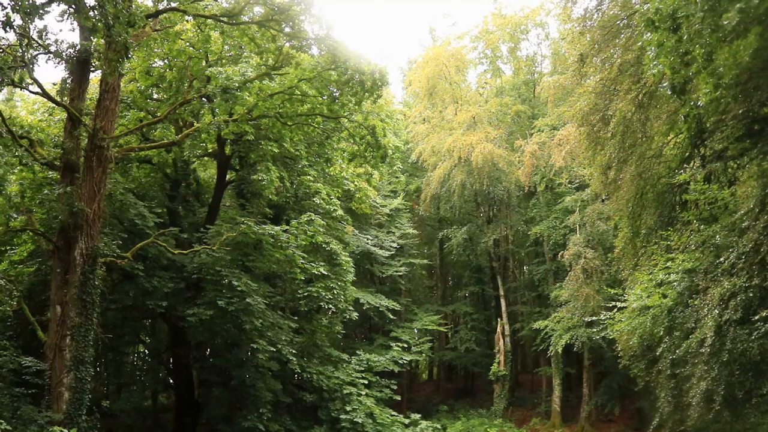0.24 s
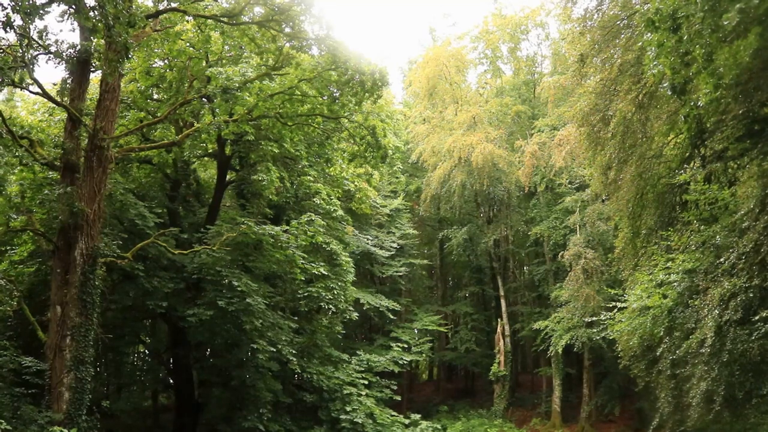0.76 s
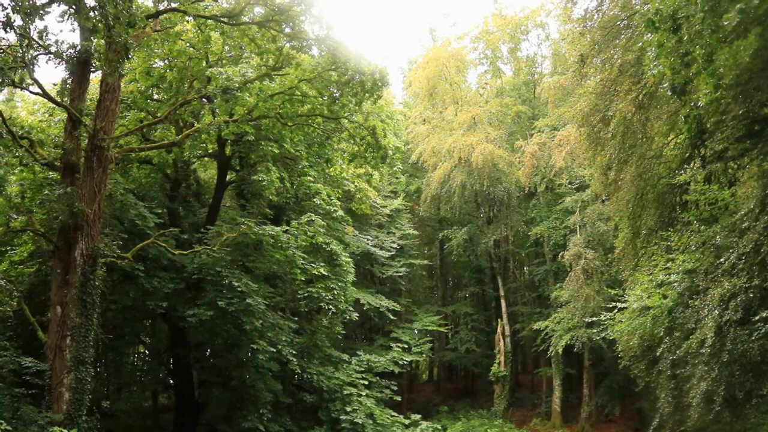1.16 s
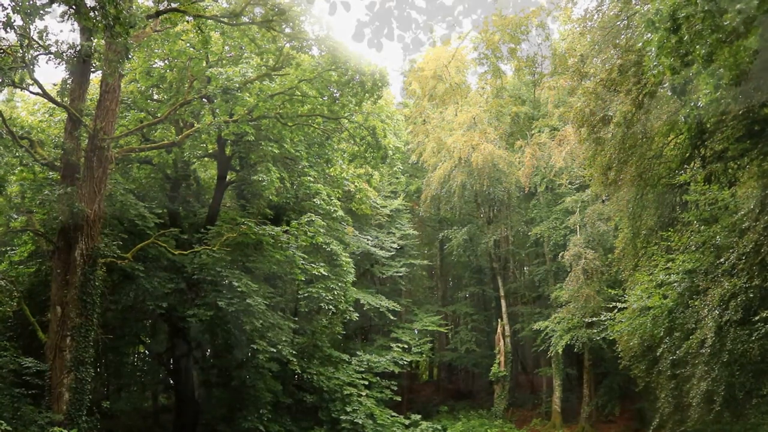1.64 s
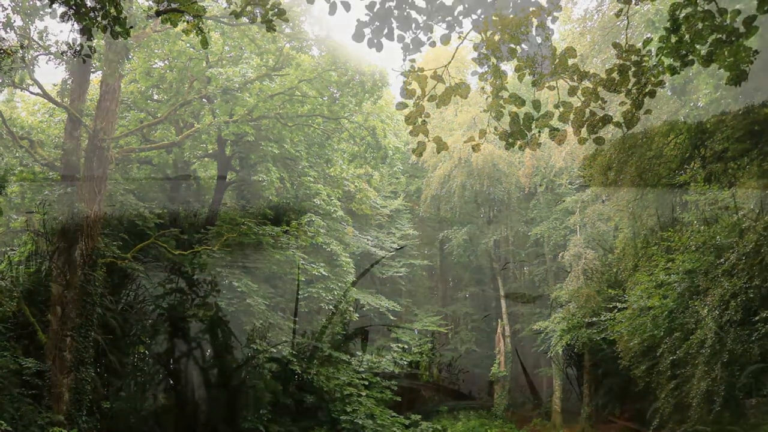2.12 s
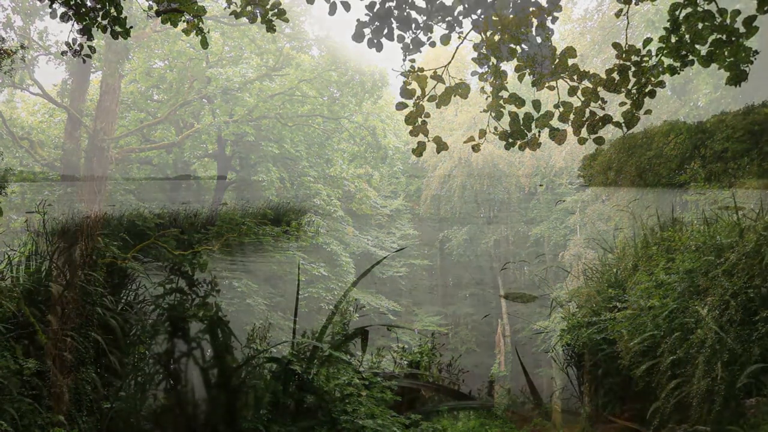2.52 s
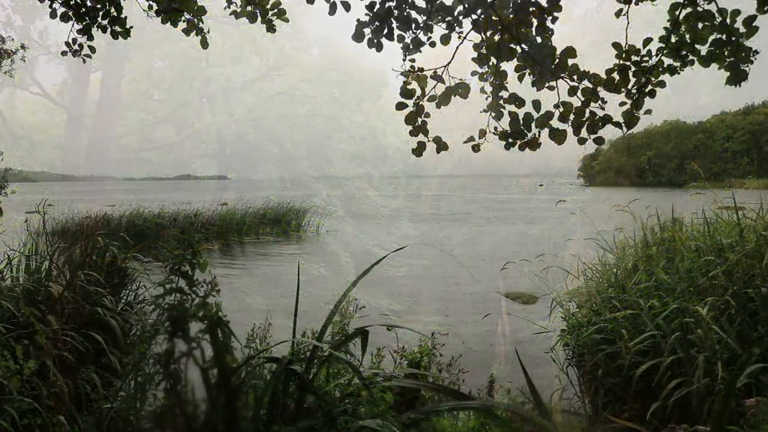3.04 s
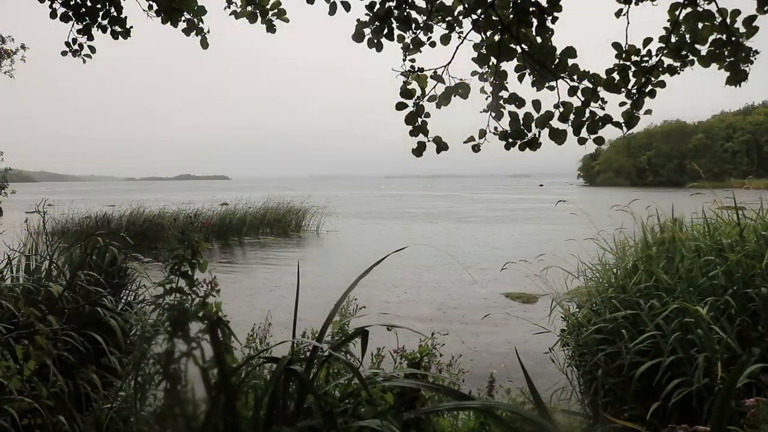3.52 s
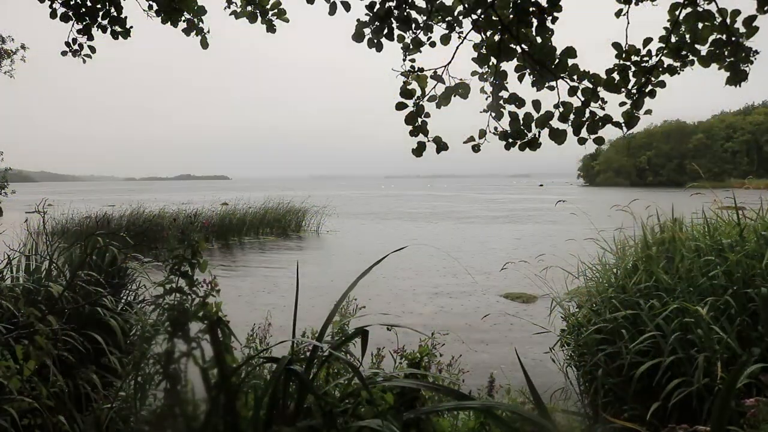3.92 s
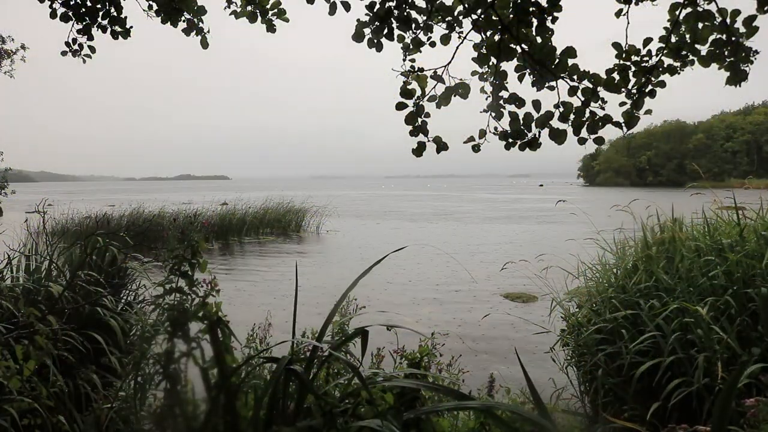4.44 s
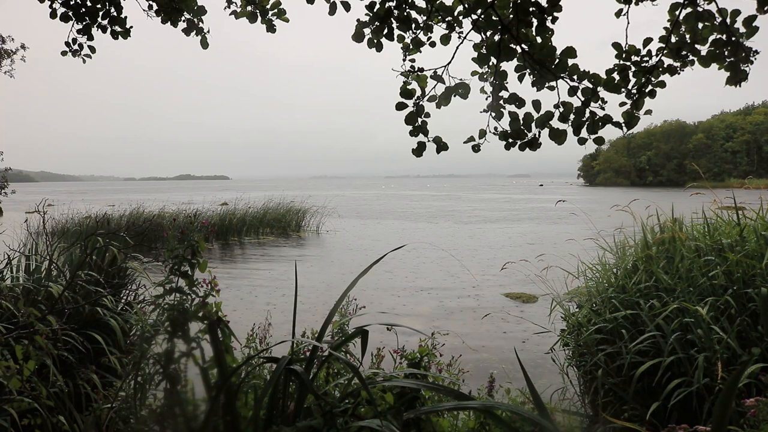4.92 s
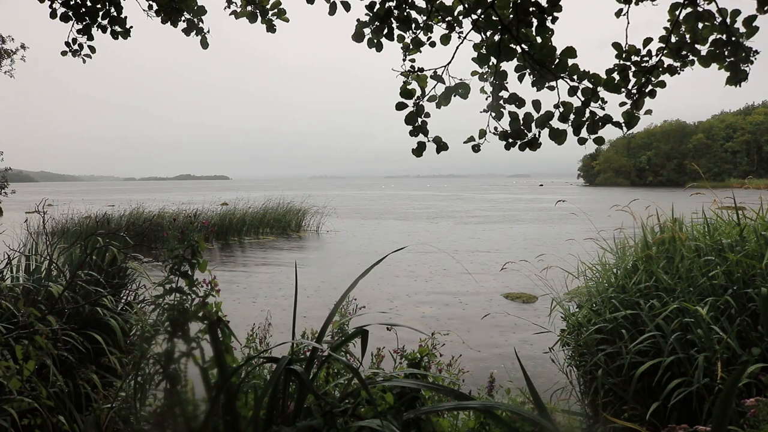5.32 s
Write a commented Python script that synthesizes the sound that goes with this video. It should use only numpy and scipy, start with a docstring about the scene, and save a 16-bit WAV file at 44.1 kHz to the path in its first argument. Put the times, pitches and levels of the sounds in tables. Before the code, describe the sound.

Soft woodland rain swells into louder lakeside rain, with sharp single drops hitting leaves near the microphone.

```python
"""Fat drips land close by under a tree, each with a slap, a low thud and a burst of spray.
Behind them, steady rain in a wood gives way to rain on a lake shore: countless far drops blur into
a hiss, and nearer ones patter and tick on leaves. A few bubbles ring in a puddle, and there is one
soft, hollow plop. The hardest drips overload the recorder, whose limiter briefly turns the rain down."""
import sys
import numpy as np
from scipy import signal
from scipy.fft import rfft, irfft
from scipy.io import wavfile
from scipy.ndimage import uniform_filter1d

SR = 44100
rng = np.random.default_rng(int(sys.argv[2]) if len(sys.argv) > 2 else 0)


def master_out(mix):
    """Clip the mix to full scale and print it as 16-bit PCM to the path in sys.argv[1]."""
    frames = np.transpose(np.atleast_2d(mix))
    ceiling = np.clip(frames, -1, 1)
    pcm = np.round(ceiling * 32767).astype(np.int16)
    wavfile.write(sys.argv[1], SR, pcm)


N = 246078
TIME = np.arange(N) / SR
TOP_HZ = 16000  # upper edge of the treble

# Fat drips close by. Pan is how much louder the left side is than the right.
# (time [s], strength [dB], pan [dB], slap pitch [Hz], slap decay [cycles],
#  thud compared with slap [dB], thud starting pitch [Hz], spray compared with slap [dB])
FAT_DRIPS = [(2.373, -15.5, -19, 1210, 0.39, -10, 220, -14),
             (2.5185, -19, -27, 2520, 0.79, -4.5, 237, -3.5), (2.7285, -8, 8, 1180, 0.55, -25, 229, -9),
             (3.206, -3, 24, 1510, 0.24, -23, 192, -14.5), (3.3443, -1, -10, 1330, 0.38, -11, 140, -21),
             (3.3819, 10.5, -24, 1180, 0.2, -3, 390, -22), (3.3952, -14, -23, 1250, 0.42, 11.5, 243, -8),
             (3.6255, -1.5, -0.5, 1850, .8, -15.5, 138, -17.5), (4.477, -11.5, 13, 910, .3, -29, 292, -5.5),
             (4.518, -3, 35, 2960, 0.34, -19, 510, -11.5), (4.6892, -2.5, 13, 2230, 1.2, -22, 476, -8.5),
             (4.7039, -1, 3, 2380, 1.6, -36, 150, -48), (4.726, -11.5, -8, 1490, 1.2, -12.5, 100, -14),
             (5.1227, 17, -9.5, 874, 0.12, -5, 180, -22), (5.405, -6.5, -4, 1740, 1.45, -13.5, 228, -17.5)]
# Tone of the spray a drip throws up: (frequency [Hz], level [dB])
SPRAY_TONE = [(100, -39), (500, 1), (1600, 8.5), (3000, 5.5), (6000, -4.5), (10000, -11), (16000, -40)]
# Light drops on nearby leaves: (time [s], strength [dB], pan [dB], pitch [Hz])
LEAF_TICKS = [(0.0881, -22, 0, 4100), (.134, -25, 0, 2340), (1.1118, -28, 1, 4400), (1.2954, -26, -3, 1800),
              (1.7647, -26.5, -1.5, 1200), (2.6926, -19.5, -15, 1400), (2.733, -14, 19, 1520),
              (2.879, -14, 22, 1450), (2.9207, -18.5, 1, 1640), (3.082, -13.5, 13, 1900),
              (3.335, -13.5, -3, 1920), (3.366, -15, -19, 1440), (3.3701, -15, -2, 1700),
              (3.6323, -13.5, 2, 2190), (3.689, -20.5, 1, 5700), (4.0425, -15.5, 4, 4960),
              (4.6641, -10.5, -3, 2240), (4.6768, -7.5, 7, 2430)]
# Drops that ring a bubble in a puddle: (time [s], pitch [Hz])
BUBBLES = [(2.755, 2650), (2.976, 2970), (4.371, 3120), (5.308, 3100)]
# Tone of the rain's hiss in each place: (frequency [Hz], level [dB])
WOOD_TONE = [(15, -42), (25, -3), (76, -9.5), (157, -1), (190, -8), (256, -5.5), (301, -7), (335, -6),
             (463, -2), (516, -2.5), (911, -6.5), (1400, -3), (5000, -3.5), (9840, -11.5), (16000, -29.5)]
LAKE_TONE = [(15, -53), (25, -20), (76, -5.5), (141, -13), (335, -5.5), (962, -6), (1520, 0.5), (2000, -3),
             (2410, 0), (2760, -3.5), (4250, -8.5), (5730, -10.5), (9070, -19), (12900, -25.5),
             (16000, -34.5)]
# How alike the hiss is on the left and right: (frequency [Hz], likeness [-1 to 1])
WOOD_LIKENESS = [(60, 0.5), (180, 0.2), (550, 0.55), (1650, -0.1), (4970, -0.08), (15000, -0.13)]
LAKE_LIKENESS = [(60, 0.82), (180, 0.84), (550, 0.82), (1650, -0.13), (4970, -0.12), (15000, 0.041)]
# Which side the hiss leans to: (frequency [Hz], pan [dB])
WOOD_PAN = [(60, 1), (240, -0.5), (950, 0.0), (3770, 0.5), (15000, 6)]
LAKE_PAN = [(60, -0.5), (180, -2), (550, -0.5), (1650, -2), (4970, 4.5), (15000, -2.5)]


def fat_drips(spray_decay_s=0.0019, spray_rise_s=0.0001, snap_hz=3800, snap_db=4):
    """Each drip slaps a surface, leaves it wobbling, and bursts into spray with a snap."""
    t, out = np.arange(4096) / SR, np.zeros((2, N))
    snap = amp(snap_db) * ring(t, snap_hz, cycles=0.31, brightness=4.8)
    spray_shape = np.exp(-t / spray_decay_s) * (1 - np.exp(-t / spray_rise_s))
    for start_s, db, pan_db, hz, cycles, thud_db, thud_hz, spray_db in FAT_DRIPS:
        slap = ring(t, hz, cycles, brightness=1.69, order=5)
        impact = panned(pan_db) * (slap + amp(thud_db) * thud(t, thud_hz))
        spray = with_tone(rng.standard_normal((2, len(t))), SPRAY_TONE) * spray_shape
        burst = panned(0.73 * pan_db) * amp(spray_db) * (snap + spray)  # nearer the middle
        add(out, start_s, amp(db) * (impact + burst))
    return cut_bass(out, hz=70)  # the drips carry little deep bass


def ring(t, hz, cycles, brightness=2.07, order=3):
    """A struck surface swings and dies away; a soft drop stirs up little above that pitch."""
    age = t * hz  # in cycles
    swing = -np.sin(2 * np.pi * age) * np.exp(-age / max(cycles, 0.1))
    soften = signal.butter(order, min(brightness * hz, TOP_HZ), fs=SR, output="sos")
    swing = signal.sosfilt(soften, swing)
    return swing / abs(swing).max()


def thud(t, hz, decay_cycles=1.0, rise_cycles=0.22, sag_to=0.7, sag_s=0.005):
    """The wobble after a drip builds quickly, sinks in pitch and dies in a few swings."""
    pitch_hz = hz * (sag_to + (1 - sag_to) * np.exp(-t / sag_s))
    age = np.cumsum(pitch_hz) / SR  # in cycles
    return np.sin(2 * np.pi * age) * np.exp(-age / decay_cycles) * (1 - np.exp(-age / rise_cycles))


def near_ticks():
    """The light drops that land on the nearest leaves."""
    out = np.zeros((2, N))
    for start_s, db, pan_db, hz in LEAF_TICKS:
        add(out, start_s, leaf_tick(db, pan_db, hz))
    return out


def leaf_tick(db, pan_db, hz, cycles=0.33, splash_db=-11, splash_s=0.0036):
    """A light drop snaps on a leaf and scatters into droplets around the same pitch."""
    t = np.arange(1024) / SR
    tone = [(hz / 6, -14), (hz, 0), (hz * 3, -15), (hz * 8, -36)]
    splash = with_tone(rng.standard_normal((2, len(t))), tone) * np.exp(-t / splash_s)
    return amp(db) * panned(pan_db) * (ring(t, hz, cycles) + amp(splash_db) * splash)


def bubble_plinks(db=-31, cycles=14, pan_db=3):
    """Small bubbles trapped in a puddle ring briefly."""
    t, out = np.arange(2048) / SR, np.zeros((2, N))
    for start_s, hz in BUBBLES:
        add(out, start_s, amp(db) * panned(pan_db) * ring(t, hz, cycles))
    return out


def plop(start_s=0.3565, hz=345, db=-36, swell_s=0.0054):
    """One soft, hollow note in the wood swells and dies in a few swings."""
    t = np.maximum(TIME - start_s, 0)
    swell = (t / swell_s * np.exp(1 - t / swell_s)) ** 2
    return amp(db) * np.sin(2 * np.pi * hz * t) * swell


def steady_rain(wood_db=-44, lake_db=-35.5, fade_start_s=1.515, fade_length_s=1.58):
    """Bright rain in the wood fades into fuller rain on the shore; fine droplets prickle in both."""
    wood = far_hiss(WOOD_TONE, WOOD_LIKENESS, WOOD_PAN, patchy_db=0.27, flicker_db=0.85)
    wood += patter(db=-13.5, per_s=700, hz_range=(1370, 8950), spread_db=-1, cycles=0.64, width_db=11)
    wood += patter(db=-17, per_s=95, hz_range=(5850, 11700), spread_db=1, cycles=1.3, width_db=14)
    wood += stray_ticks(per_s=6, db=11.5, spread_db=5, low_hz=2200, high_hz=7500)
    lake = far_hiss(LAKE_TONE, LAKE_LIKENESS, LAKE_PAN, patchy_db=1.0, flicker_db=1.6)
    lake += patter(db=-9, per_s=600, hz_range=(1070, 6800), spread_db=4.5, cycles=1.17, width_db=34)
    lake += patter(db=-20, per_s=87, hz_range=(4460, 11800), spread_db=7.5, cycles=5.4, width_db=16)
    lake += stray_ticks(per_s=4, db=10, spread_db=-0.5, low_hz=1190, high_hz=5700)
    lake_share = np.clip((TIME - fade_start_s) / fade_length_s, 0, 1)
    return amp(wood_db) * (1 - lake_share) * wood + amp(lake_db) * lake_share * lake


def stray_ticks(per_s, db, spread_db, low_hz, high_hz, width_db=7):
    """Fainter drops land at random on the leaves around; db is compared with the hiss."""
    out = np.zeros((2, N))
    for when, size, side, pitch in rng.random((round(per_s * N / SR), 4)):
        hz = low_hz * (high_hz / low_hz) ** pitch
        tick = leaf_tick(db + spread_db * (2 * size - 1), width_db * (2 * side - 1), hz)
        add(out, when * N / SR, tick)
    return out


def patter(db, per_s, hz_range, spread_db, cycles, width_db, leaves=36):
    """Drops farther off tap leaves, each with its own pitch and place; db is compared with the hiss."""
    t, out = np.arange(1024) / SR, np.zeros((2, N))
    for hz in np.geomspace(*hz_range, leaves):
        hits = rng.random(N) < per_s / leaves / SR
        size_db = spread_db * np.minimum(rng.exponential(1, N), 4)
        tap = ring(t, hz, cycles * rng.uniform(0.15, 3.5))
        taps = signal.oaconvolve(hits * amp(size_db), tap)[:N]  # one tap for every hit
        out += panned(width_db * rng.standard_normal()) * taps
    return amp(db) * unit_level(out)


def far_hiss(tone, likeness, pan, patchy_db, flicker_db):
    """Countless far drops merge into a hiss that flickers, both as a whole and in small patches."""
    frames, hz = N // 256 + 5, np.fft.rfftfreq(1024, 1 / SR)
    a, b, c, d, patches = rng.standard_normal((5, frames, len(hz)))  # noise over time and frequency
    patches = uniform_filter1d(patches, size=5, axis=0)
    patches = unit_level(uniform_filter1d(patches, size=12, axis=1))
    flicker = unit_level(uniform_filter1d(rng.standard_normal(frames), size=4))[:, None]
    alike = np.clip(at_hz(likeness, hz), -1, 1)
    left = a + 1j * b
    right = alike * left + np.sqrt(1 - alike ** 2) * (c + 1j * d)
    lean = amp(at_hz(pan, hz) / 2)
    grid = np.array([left * lean, right / lean]) * amp(patchy_db * patches + flicker_db * flicker)
    _, noise = signal.istft(grid.swapaxes(1, 2), nperseg=1024, noverlap=768)  # grid to sound wave
    return with_tone(noise[:, :N], tone)


def amp(db):
    """Turns decibels into a number to multiply by."""
    return 10 ** (np.asarray(db) / 20)


def unit_level(x):
    """Scales a signal to an average level (rms) of one."""
    return x / np.sqrt(np.mean(x ** 2) + 1e-20)


def at_hz(table, hz):
    """Reads between the rows of a table, with octaves evenly spaced."""
    row_hz, value = np.transpose(table)
    return np.interp(np.log(hz + 1), np.log(row_hz + 1), value)


def with_tone(x, tone):
    """Shapes a sound's bass and treble, then sets its level to one."""
    size = x.shape[-1]
    gains = amp(at_hz(tone, np.fft.rfftfreq(size, 1 / SR)))
    return unit_level(irfft(rfft(x) * gains, size))


def cut_bass(x, hz):
    """Gently weakens everything below hz."""
    return signal.sosfilt(signal.butter(1, hz, "high", fs=SR, output="sos"), x)


def panned(pan_db):
    """Left and right volumes; the nearer side gets the full level."""
    return amp(np.minimum([[pan_db], [-pan_db]], 0))


def add(mix, start_s, sound):
    """Mixes in a stereo sound at the given time."""
    part = mix[:, max(round(start_s * SR), 0):][:, :sound.shape[1]]
    part += sound[:, :part.shape[1]]


def scene():
    """Rain and drops in the open air, with no echo."""
    return steady_rain() + fat_drips() + near_ticks() + bubble_plinks() + plop()


def record(dry, low_cut_hz=70, limit_db=-3.0, release_s=0.049):
    """The recorder trims deep bass and top treble; its limiter turns the volume down on loud hits."""
    x = cut_bass(dry, low_cut_hz)
    peak_db = 20 * np.log10(abs(x).max(0) + 1e-9)
    over_db = np.maximum(peak_db - limit_db, 1e-9)
    recovery = TIME / release_s  # the volume creeps back after each overload
    dip_db = np.exp(np.maximum.accumulate(np.log(over_db) + recovery) - recovery)
    dip_db = signal.lfilter([0.02], [1, -0.98], dip_db)  # too slow for the first swing, which clips
    x = np.clip(x * amp(-dip_db), -1, 1)
    treble_cut = signal.firwin(401, TOP_HZ, window=("kaiser", 8), fs=SR)
    return signal.oaconvolve(x, treble_cut[None], "same")


dry = scene()
out = record(dry)
master_out(out)
```